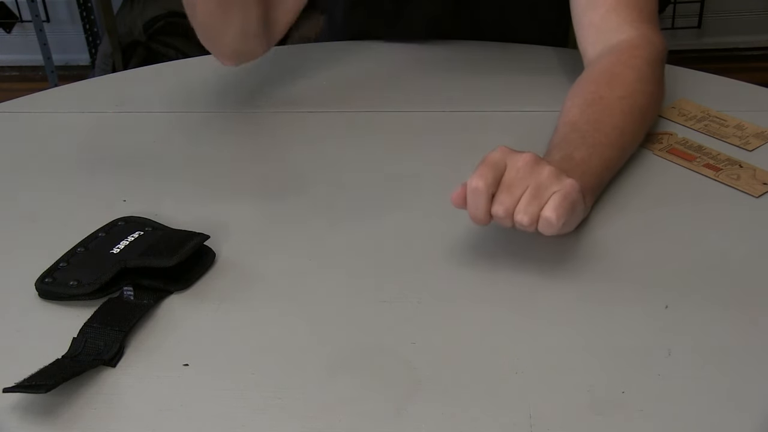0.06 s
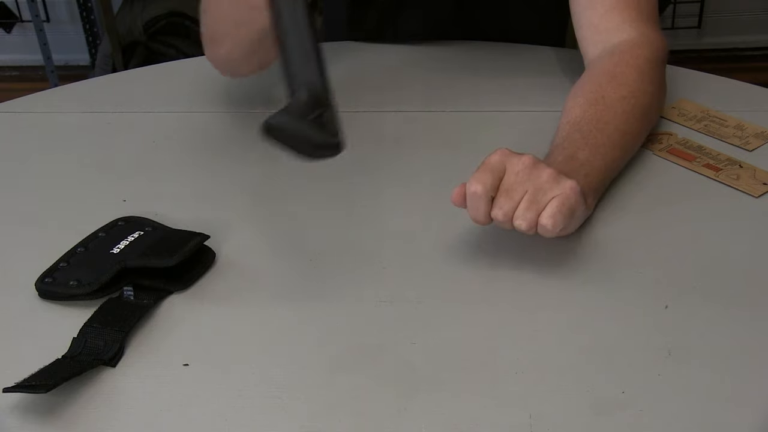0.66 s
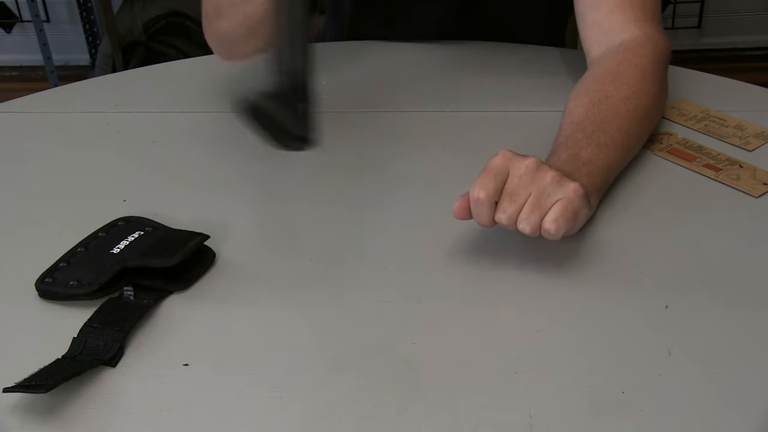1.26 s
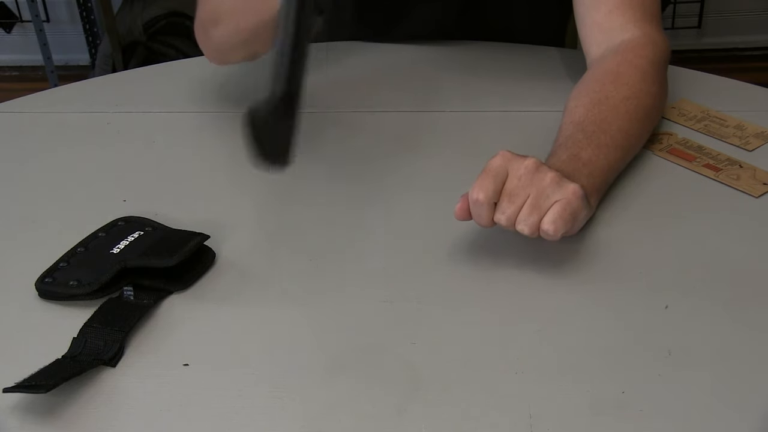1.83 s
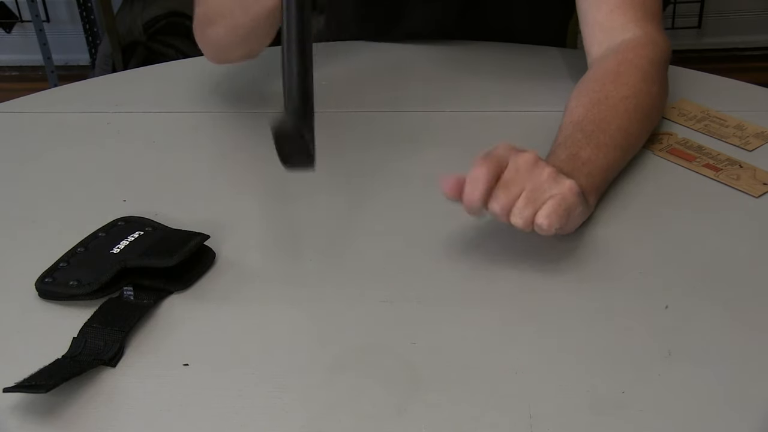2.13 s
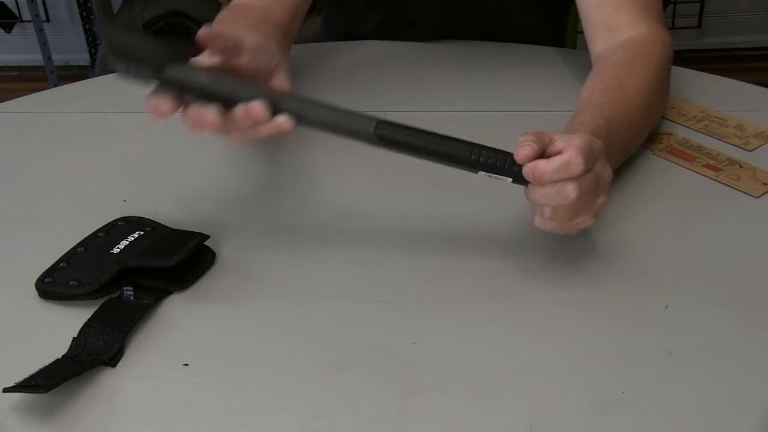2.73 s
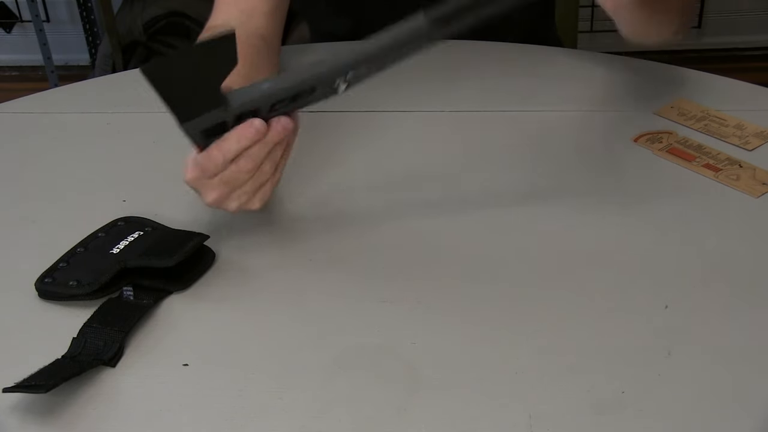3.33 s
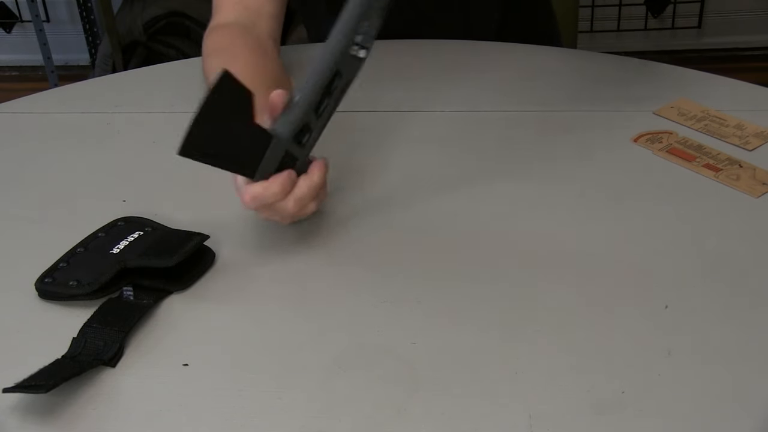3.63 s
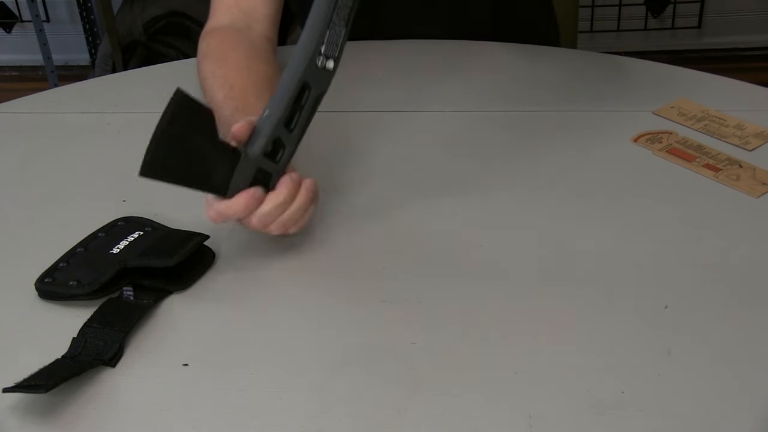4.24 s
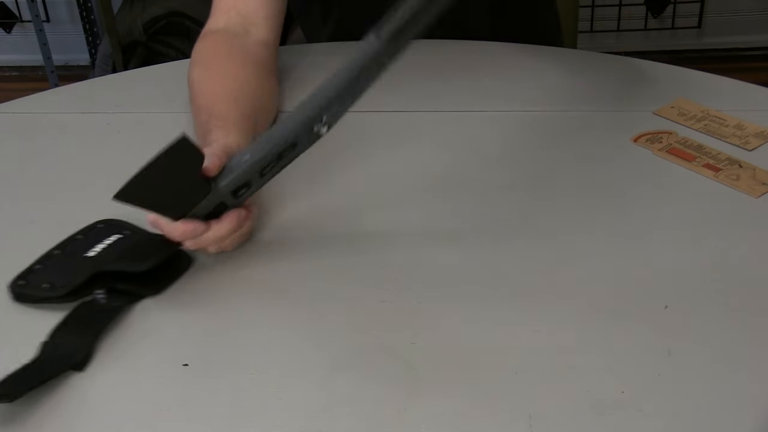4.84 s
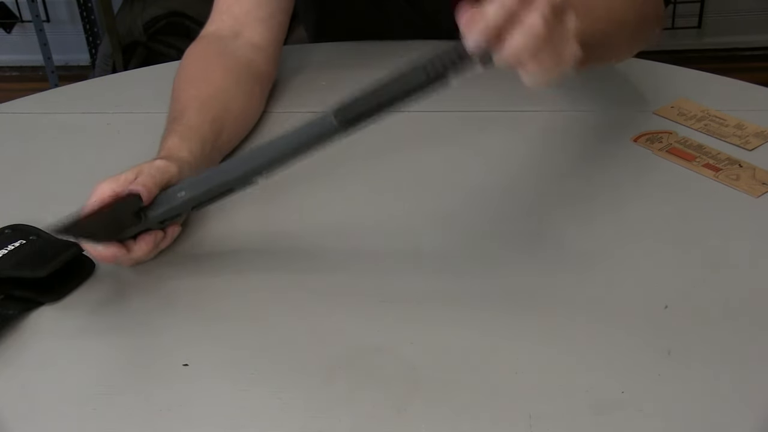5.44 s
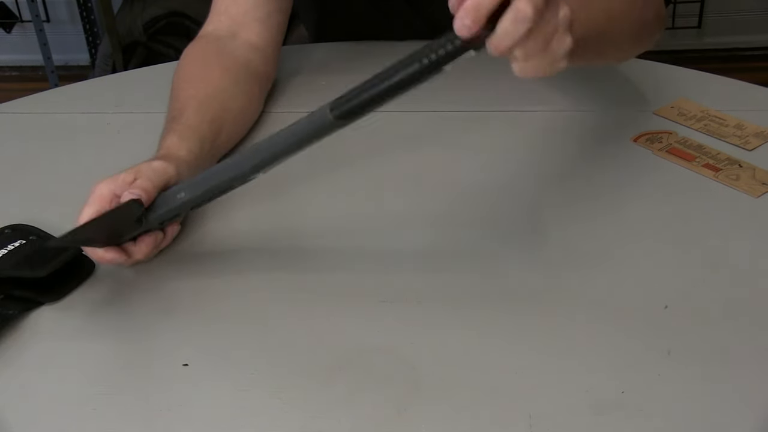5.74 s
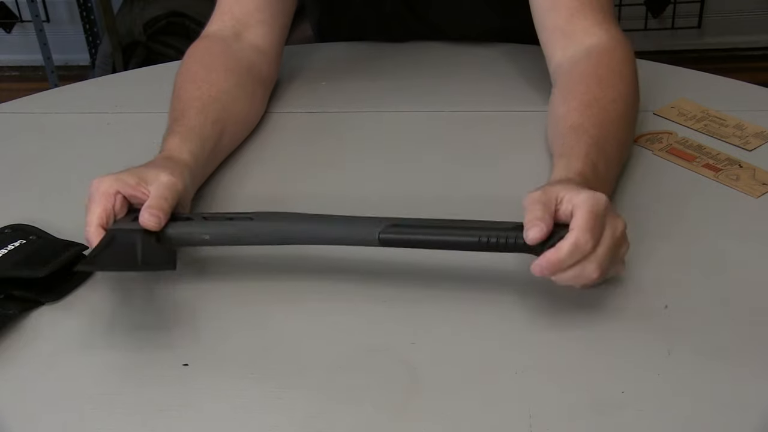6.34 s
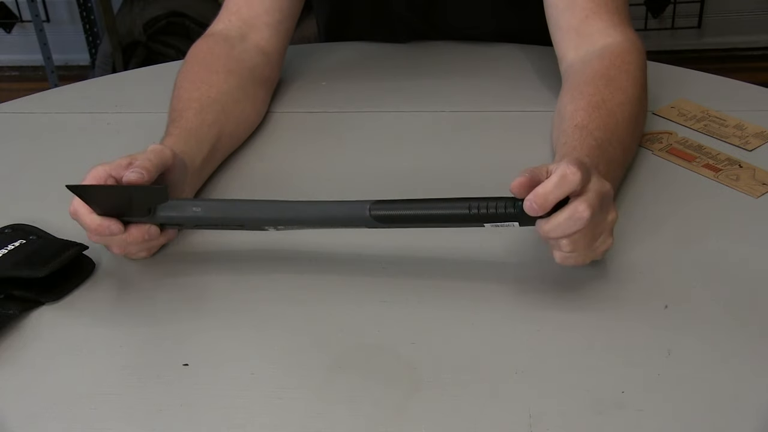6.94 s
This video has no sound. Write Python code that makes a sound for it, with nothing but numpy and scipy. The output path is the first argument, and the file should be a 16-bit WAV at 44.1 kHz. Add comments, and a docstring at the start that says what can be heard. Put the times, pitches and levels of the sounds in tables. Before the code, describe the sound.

Heard close up in a small, slightly echoing room, something loose slides around in a hatchet's plastic handle, giving scattered clacks and light taps. After a rustle of skin and sleeve and a dull elbow thump on the table, steady shaking sets off a quick back-and-forth rattle of sharp clacks and hollow knocks, with a small metal part ringing along at the end. Faint rubbing and a low room hum remain.

```python
"""A hatchet is swung over a table in a small echoing room. A loose piece slides inside its hollow plastic
handle, clacking brightly on one end and tapping softly, while a small metal part pings. Near 3 s, arms
and hands rub over table and handle, and an elbow bumps the table top. From 3.7 to 6 s the hatchet is
shaken: clacks alternate with hollow clonks from the other end, and after 5 s the metal rings along.
Over the steady room hum, a lower drone swells once near 6 s and fades. One close microphone hears it."""
import sys
import numpy as np
from scipy import signal
from scipy.fft import rfft, irfft, next_fast_len
from scipy.io import wavfile
from scipy.ndimage import uniform_filter1d, map_coordinates

SR = 44100
rng = np.random.default_rng(int(sys.argv[2]) if len(sys.argv) > 2 else 0)


def output_pcm(signal):
    """Save a mono or channel-first signal as 16-bit PCM at the path in sys.argv[1].

    Samples are clipped to [-1, 1] before scaling.
    """
    pcm = np.clip(np.atleast_2d(signal).T, -1, 1) * 32767
    wavfile.write(sys.argv[1], SR, np.round(pcm).astype(np.int16))


N = 317211
SNAP_HZ, TICK_HZ, TOP_HZ = 3000, 7500, 16000  # where a hit's snap and tick begin; highest pitch kept

# The loose piece hits the hard end. Brightness is how much louder the snap is than the hollow body.
# (time [s], level [dB], brightness [dB])
CLACK_HITS = [(0.1635, -18.5, 12.5), (1.513, -19.5, 9.5), (1.6916, -20, 7.5), (1.6998, -22, 5),
              (1.9184, -18, 8.5), (3.6696, -15.5, 1), (3.6765, -18.5, -0.5), (3.8123, -15, 3.5),
              (3.979, -16.5, 4), (4.1511, -15.5, 7), (4.3224, -19, 4.5), (4.452, -18.5, 6),
              (4.5719, -18, 6), (4.7226, -18.5, 4.5), (4.87, -19.5, 2), (5.0826, -26.5, 6.5),
              (5.3147, -18.5, 10), (5.4605, -15.5, 9.5), (5.5968, -16.5, 8.5), (5.721, -19, 4),
              (5.855, -22.5, 7)]
# Each shake throws it back against the other end: (time [s], level [dB], brightness [dB])
CLONK_HITS = [(3.7301, -15, 3), (3.8999, -16, 8), (4.0684, -17, 8.5), (4.2439, -16, 2.5), (4.3877, -18, 3),
              (4.5093, -19, 0.5), (4.6532, -19, -2), (4.7982, -17.5, 2), (4.9672, -31.5, 5),
              (4.9759, -22, 1.5), (5.1346, -36, 4), (5.181, -41.5, -10), (5.3751, -16, 1), (5.527, -15, 4),
              (5.6549, -16, 1.5), (5.7808, -16, 3.5), (5.9452, -30.5, -3.5)]
# It taps softly inside the handle during the swings: (time [s], level [dB], brightness [dB])
SOFT_TAPS = [(0.1562, -28.5, 5), (0.2278, -29, -2), (0.3403, -28.5, -13), (0.3744, -33, -4),
             (0.5259, -29, -5), (0.7645, -28, -5), (1.1822, -49, -12), (1.2002, -50, -15),
             (1.3016, -33.5, -5), (1.4078, -25, -5), (1.5176, -23, -3.5), (1.5914, -26, -5.5),
             (1.7939, -21.5, 2), (2.0245, -21, -1), (2.1817, -26, -3.5), (2.2711, -32.5, -10.5),
             (2.4911, -42.5, -9), (2.536, -39, -6.5)]
# The notes the handle rings at. Ring time (t60) is how long a note takes to fade by 60 dB.
# (pitch [Hz], ring time [s], level in a clack [dB], in a clonk [dB], in a tap [dB])
HANDLE_NOTES = [(1242, 0.0086, -14.5, -21, -2), (1654, 0.019, -10, -4, 1.5), (1870, 0.02, -8.5, -28, 4.5),
                (2513, 0.0097, -4, 3, 1), (3040, 0.004, -3.5, -3, -0.5), (3500, 0.01, -1, -67.5, -1.5),
                (4152, 0.0095, 3, -17.5, -2), (4326, 0.0059, 6, -27.5, -19),
                (5230, 0.011, -5, -14.5, -37.5), (5910, 0.0088, -9, -12.5, -48),
                (6700, 0.013, -10.5, -45, -36), (8940, 0.0036, -53.5, -14.5, -22),
                (9670, 0.025, -14, -63, -36), (10160, 0.019, -13, -18, -49.5), (11130, .010, -33, -44, -41)]
# What the handle sends into the room: (pitch [Hz], level in a clack [dB], in a clonk [dB], in a tap [dB])
HANDLE_SPREAD = [(390, -28.5, -22, -20), (900, -16, -12, -14), (1355, -16.5, 3, -12),
                 (1716, -10.5, 3.5, -5.5), (1785, -10, -13.5, 4.5), (1990, -12.5, 3, -8),
                 (2880, -5, 8, -7.5), (3020, -7.5, -5, -12.5), (3980, 0, 5.5, -10.5),
                 (4970, -4.5, -0.5, -19.5), (6340, -9.5, -5, -20.5), (8700, -24.5, -23, -34),
                 (10200, -22.5, -19.5, -32), (15200, -37, -45.5, -47.5)]


def handle():
    """The loose piece strikes the same hollow handle from inside, in three ways."""
    clack_db, clonk_db, tap_db = np.transpose(HANDLE_NOTES)[2:]
    clack_spread, clonk_spread, tap_spread = np.transpose(HANDLE_SPREAD)[1:]
    clacks = rattle(CLACK_HITS, clack_db, clack_spread, tick_db=-6.5, room_db=-9, hollow_db=4,
                    graze_db=-24, rebound=0.35, rebound_s=0.000983, crack_db=4.5)
    clonks = rattle(CLONK_HITS, clonk_db, clonk_spread, tick_db=-17, room_db=-12, hollow_db=2,
                    graze_db=-18, rebound=0.61, rebound_s=0.00122, crack_db=-2.5)
    taps = rattle(SOFT_TAPS, tap_db, tap_spread, tick_db=-13, room_db=-10.5, hollow_db=0,
                  graze_db=-12.5, rebound=0.54, rebound_s=0.001024, crack_db=-3)
    return clacks + clonks + taps


# The high tick of a hit carries best while the hatchet is upright: (time [s], level change [dB])
TICK_LEVEL = [(0.2, -10), (1.5, -15.5), (2.5, -19), (3.7, -4.5), (4.5, -2), (5.4, -9.5)]


def rattle(hits, notes_db, spread_db, tick_db, room_db, hollow_db, graze_db, rebound, rebound_s, crack_db):
    """Each time, the piece grazes the plastic, then hits it, and the room echoes."""
    track = np.zeros(N)
    times, _, brightness = np.transpose(hits)
    treble = np.interp(times, *np.transpose(TICK_LEVEL))
    for (s, db, bright_db), treble_db in zip(hits, treble):
        body_db, snap_db = db - bright_db / 2, db + bright_db / 2
        bands_db = body_db, snap_db, snap_db + tick_db + treble_db
        hit, graze = (strike(bands_db, notes_db, rebound, rebound_s, crack_db) for _ in range(2))
        add(track, s, hit)
        add(track, s - rng.uniform(0.002, .008), amp(graze_db + rng.normal(0, 1.5)) * graze)
        add(track, s - rng.uniform(0.0011, .002), amp(graze_db) * graze)  # one edge touches first
        add(track, s + rng.uniform(.0105, .013), amp(-22.5) * hit)  # echo off the ceiling
        colour = echo_colour(spread_db, s, bright_db - brightness.mean(), treble_db - treble.mean(),
                             hollow_db)
        add(track, s, amp(db + room_db) * room_echo(colour))
    return track


def strike(bands_db, notes_db, rebound, rebound_s, crack_db):
    """One hit cracks, rings the handle briefly and bounces about a millisecond later."""
    t = np.arange(int(.04 * SR)) / SR
    hz, t60 = np.transpose(HANDLE_NOTES)[:2, :, None]
    hz = hz * (1 + .018 * rng.standard_normal(hz.shape))  # the grip shifts the notes a little
    gains = amp(notes_db + 1.5 * rng.standard_normal(len(hz))) * (-1) ** np.arange(len(hz))
    ring = gains @ (np.sin(2 * np.pi * hz * t) * amp(-60 * t / t60))
    crack = amp(crack_db - 60 * t / 0.0033) * uniform_filter1d(rng.standard_normal(len(t)), size=2)
    sound = ring + crack
    bounce_s = rebound_s * (1 + .055 * rng.standard_normal())
    add(sound, bounce_s, rebound * uniform_filter1d(ring, size=3))  # the second touch is softer
    # the hit's force and hardness set how loud body, snap and tick are in the first 5 ms
    bands_hz = [(850, SNAP_HZ), (SNAP_HZ, TICK_HZ), (TICK_HZ, 12500)]
    hit = np.zeros(len(t))
    for edges, db in zip(bands_hz, bands_db):
        band = signal.sosfilt(signal.butter(3, edges, "bandpass", fs=SR, output="sos"), sound)
        hit += amp(db) * band / np.sqrt(np.mean(band[:int(.005 * SR)] ** 2))
    return hit


# The handle's hollow note sinks as the grip changes: (time [s], pitch [Hz])
HOLLOW_NOTE = [(2.5, 1850), (3.7, 1720), (5.4, 1630)]


def echo_colour(spread_db, s, bright_db, treble_db, hollow_db, follow=0.38, half_width_hz=99):
    """A brighter hit sends a brighter sound into the room, with a lift at the hollow note."""
    hz = np.geomspace(100, TOP_HZ, num=200)
    base_db = along(np.column_stack([np.transpose(HANDLE_SPREAD)[0], spread_db]), hz)
    snap_db = bright_db * (.5 - 1 / (1 + (hz / SNAP_HZ) ** 6))
    tick_db = treble_db * (1 - 1 / (1 + (hz / TICK_HZ) ** 10))
    note_hz = np.interp(s, *np.transpose(HOLLOW_NOTE))
    note_db = hollow_db / (1 + ((hz - note_hz) / half_width_hz) ** 2)
    return np.column_stack([hz, base_db + follow * (snap_db + tick_db) + note_db])


# A small metal part jingles alone during the swings: (time [s], level [dB])
LONE_PINGS = [(0.347, -43), (1.401, -47), (1.633, -51)]
# Its notes: (pitch [Hz], level when swinging freely [dB], level when jolted by a clack [dB])
METAL_NOTES = [(9450, -23, 0.5), (10170, 0.5, -1), (10750, -20, -4.5), (11300, -24, -3), (12200, -26, -7)]


def metal_pings(loose_from_s=5, jolt_db=-22.5, t60=0.19, buzz=0.2):
    """The metal part rings one clear note alone; once shaken loose, several with every clack."""
    track, t = np.zeros(N), np.arange(SR // 4) / SR
    hz, free_db, jolted_db = np.transpose(METAL_NOTES)
    rings = [(s, db + free_db) for s, db in LONE_PINGS]
    rings += [(s, db + jolt_db + jolted_db + rng.normal(0, 0.5, len(hz)))
              for s, db, _ in CLACK_HITS if s > loose_from_s]
    for s, notes_db in rings:
        jitter = np.cumsum(rng.normal(0, buzz, (len(hz), len(t))), axis=1)  # it buzzes in its seat
        ring = amp(notes_db) @ np.sin(2 * np.pi * hz[:, None] * t + jitter)
        add(track, s, in_room(ring * amp(-60 * t / t60), room_db=-2.5))
    return track


# Arm and elbow land on the table: (time [s], level [dB], length of the touch [s])
ELBOW_BUMPS = [(2.921, -24.5, 0.0038), (2.939, -25.5, 0.0056), (2.973, -33.5, 0.0002), (3.001, -29, 0.0024),
               (3.012, -33.5, 0.0018), (3.058, -37, 0.0016)]
# The notes of the table top: (pitch [Hz], ring time [s], level [dB])
TABLE_NOTES = [(71.7, 0.52, -18), (121.3, 0.15, 6), (140, 0.12, 5.5), (175, 0.18, -6.5), (312, 0.13, -6),
               (382, 0.14, 0), (542, 0.051, -2.5), (734, 0.028, 3.5), (1284, 0.018, -8.5)]


def table_bumps(scuff_db=-13, scuff_t60=0.07):
    """Soft bumps scuff the table top and ring its low notes; a longer touch sounds duller."""
    track, t = np.zeros(N), np.arange(SR // 3) / SR
    scuffs = noise([(150, -12), (450, 2), (1400, -9), (4000, -25), (12000, -50)])
    for s, db, touch_s in ELBOW_BUMPS:
        shifts = 1 + .03 * rng.standard_normal(len(TABLE_NOTES))
        ring = sum(amp(level + rng.normal(0, 1.5) - 60 * t / t60) * np.cos(2 * np.pi * hz * shift * t)
                   for (hz, t60, level), shift in zip(TABLE_NOTES, shifts))
        ring += amp(scuff_db - 60 * t / scuff_t60) * scuffs[round(s * SR):][:len(t)]
        push = signal.windows.hann(3 + int(touch_s * SR))
        thud = amp(db) * signal.fftconvolve(ring, push / push.sum())
        add(track, s, in_room(thud, room_db=2))
    return filtered(track, lambda hz: 1 / (1 + 40 / (1j * hz + 1e-6)) ** 2)  # a thin top gives little bass


# Weight comes onto the table: (time [s], level [dB])
TABLE_LEANS = [(3.02, -42), (6.53, -63)]


def table_rocking(hz=30.4, rise_db_per_s=171, fade_db_per_s=41):
    """Leaning on the table rocks it: a deep rumble that grows fast and fades slowly."""
    t = np.arange(N) / SR
    sway = sum(amp(db - np.maximum(rise_db_per_s * (s - t), fade_db_per_s * (t - s)))
               for s, db in TABLE_LEANS)
    return sway * np.sin(2 * np.pi * hz * t + 0.63 * wobble(6))


# Strokes of skin and sleeve: (middle time [s], level [dB], half length [s], share of bare palm [0-1])
STROKES = [(0.047, -45, 0.039, 0.45), (0.711, -34.5, 0.033, 0.48), (1.028, -49, 0.055, 0.4),
           (1.283, -40.5, 0.029, 0.38), (1.404, -46.5, 0.022, 0.9), (2.645, -48.5, 0.089, 0.77),
           (3.0, -50.5, 0.63, 0.22), (3.55, -46.5, 0.073, 0.88), (5.132, -43, 0.13, 0.3),
           (6.707, -59, 0.15, 0)]
# The hiss of a bare palm: (pitch [Hz], level [dB])
PALM_HISS = [(500, -28), (2500, -10.5), (5000, 0), (7800, -3.5), (10500, -7.5), (16000, -20)]
# The hiss of a sleeve: (pitch [Hz], level [dB])
SLEEVE_HISS = [(500, -38), (1500, -2), (2100, -0.5), (2550, 3.5), (3300, 1.5), (4300, -0.5), (5500, -6),
               (7000, -6), (9000, -14), (13000, -16.5), (16000, -24)]
# The arms rustle dully as the grip changes: (middle time [s], level [dB], half length [s])
GRIP_CHANGES = [(2.675, -43.5, 0.22), (3.353, -42, 0.29), (7.0, -52.5, 0.63)]


def rubs(grain_db=2):
    """Skin and cloth hiss as they slide, swelling with the speed of each stroke."""
    power = np.array([swell(middle, db, half) ** 2 for middle, db, half, _ in STROKES])
    palm = np.transpose(STROKES)[3]
    hiss = np.sqrt(palm @ power) * noise(PALM_HISS) + np.sqrt((1 - palm) @ power) * noise(SLEEVE_HISS)
    rustle = noise([(80, -7), (180, -0.5), (330, -3.5), (600, -15), (1500, -18), (4000, -39)])
    rustle *= sum(swell(*row) for row in GRIP_CHANGES)
    return in_room(hiss * amp(grain_db * wobble(300)), room_db=-5)[:N] + rustle


# The rush of the ventilation: (pitch [Hz], level [dB])
AIR_RUSH = [(24, -53), (40, -21), (69, -10), (91, -5.5), (171, 0.5), (283, -10.5), (354, -11.5), (585, -20),
            (680, -18.5), (831, -18.5), (1300, -25), (16000, -44.5)]
# Its humming notes: (pitch [Hz], level [dB])
HUM_NOTES = [(137, -52), (355, -61.5)]
# The background dips a little once the shaking starts: (time [s], level change [dB])
BACKGROUND_LEVEL = [(0, -0.5), (1.7, 1), (3.6, 1), (4.2, -1.2), (7.19, -0.4)]


def ventilation(air_db=-46, drone_hz=102):
    """Air rushes steadily with a slightly wavering hum; a lower drone swells once and fades."""
    t = np.arange(N) / SR
    tone = amp(air_db) * noise(AIR_RUSH)
    hums = [(hz, amp(db)) for hz, db in HUM_NOTES]
    hums.append((drone_hz, swell(middle_s=6.08, db=-49, half_s=0.27)))
    for hz, gain in hums:
        tone += gain * amp(2 * wobble(3)) * np.sqrt(2) * np.sin(2 * np.pi * hz * t + .9 * wobble(6))
    return tone * amp(np.interp(t, *np.transpose(BACKGROUND_LEVEL)))


# How long the room rings: (pitch [Hz], ring time [s])
ROOM_RING = [(150, 0.31), (1000, 0.49), (1750, 0.7), (2600, 0.56), (4200, 0.63), (7000, 0.51),
             (12000, 0.38)]


def room_echo(colour, build_s=0.0004):
    """Many echoes blur into fading noise, new for each place the source moves to; level 1 early on."""
    size = 2 ** 15
    shape = amp(along(colour, np.fft.rfftfreq(size, 1 / SR)))
    wash = irfft(rfft(rng.standard_normal(size)) * shape)
    hz, t, spectrum = signal.stft(wash, SR, nperseg=256)
    fade = amp(-60 * t / along(ROOM_RING, hz)[:, None])
    tail = signal.istft(spectrum * fade, SR, nperseg=256)[1]
    tail *= 1 - np.exp(-(np.arange(len(tail)) / SR / build_s) ** 2)
    return tail / np.std(tail[int(.01 * SR):int(.04 * SR)])


def in_room(sound, room_db):
    """A sound followed by the room's echo."""
    tail = room_echo([(40, -7), (200, -6), (4000, -5.5), (14000, -5)])
    tail *= amp(room_db) / np.linalg.norm(tail)
    tail[0] += 1  # the direct sound
    return signal.fftconvolve(sound, tail)


def amp(db):
    """Turn decibels into a volume factor."""
    return 10 ** (np.asarray(db) / 20)


def along(points, hz):
    """Read between (pitch [Hz], value) points, with octaves evenly spaced."""
    pitches, values = np.transpose(points)
    return np.interp(np.log(hz + 1), np.log(pitches + 1), values)


def add(track, s, sound):
    """Mix a sound into the track at time s."""
    part = track[max(0, round(s * SR)):][:len(sound)]
    part += sound[:len(part)]


def filtered(x, response):
    """Turn each pitch in x up or down by response(hz)."""
    size = next_fast_len(N + 8192)
    return irfft(rfft(x, size) * response(np.fft.rfftfreq(size, 1 / SR)), size)[..., :N]


def noise(colour):
    """Noise of average (rms) level 1, shaped by (pitch [Hz], level [dB]) points."""
    x = filtered(rng.standard_normal(N), lambda hz: amp(along(colour, hz)))
    return x / np.sqrt(np.mean(x ** 2) + 1e-20)


def wobble(rate):
    """A smooth curve through `rate` random values a second."""
    return map_coordinates(rng.standard_normal(int(N * rate / SR) + 4), [np.arange(N) * rate / SR])


def swell(middle_s, db, half_s):
    """A bell-shaped rise and fall in volume that peaks at db."""
    return amp(db) * np.exp(-.5 * ((np.arange(N) / SR - middle_s) / half_s) ** 2)


def scene():
    """One microphone feeds both channels."""
    mono = handle() + metal_pings() + rubs() + table_bumps() + table_rocking() + ventilation()
    return np.array([mono, mono])


def record(dry):
    """Round off the loudest peaks and cut everything above TOP_HZ."""
    rounded = dry / (1 + np.abs(dry) ** 6) ** (1 / 6)
    return filtered(rounded, lambda hz: 1 / (1 + (hz / TOP_HZ) ** 120))


dry = scene()
out = record(dry)
output_pcm(out)
```